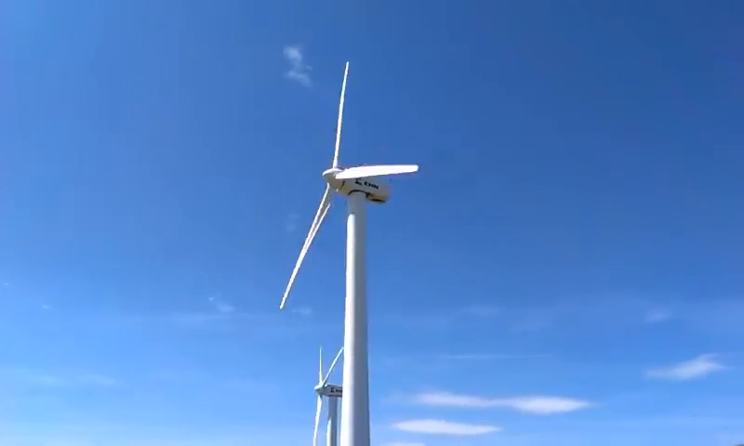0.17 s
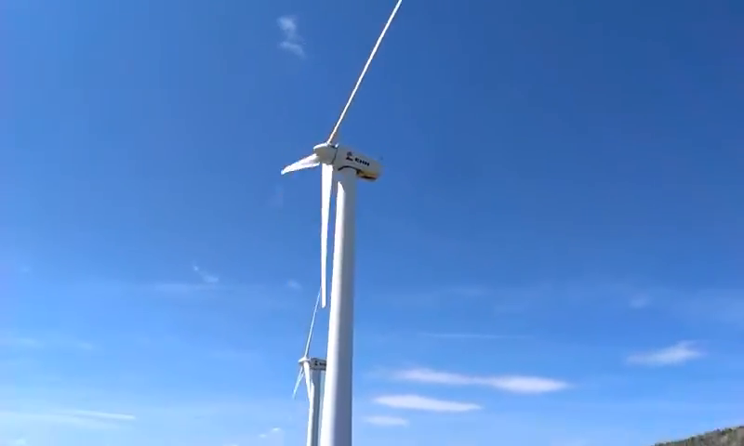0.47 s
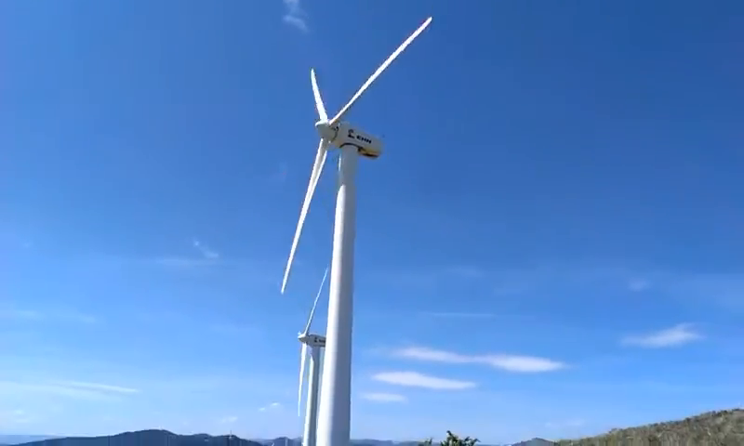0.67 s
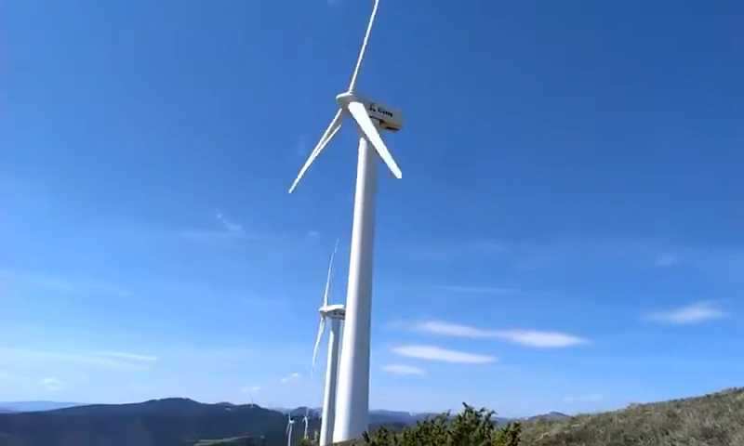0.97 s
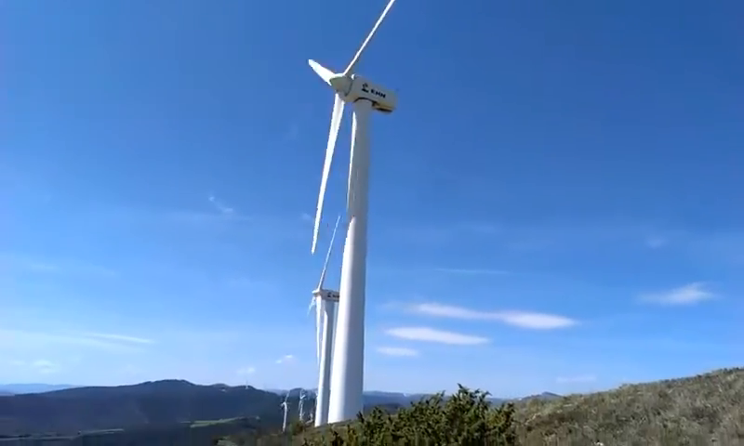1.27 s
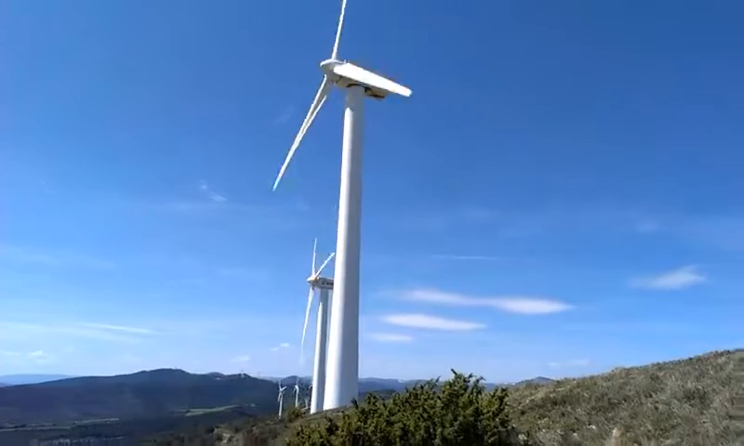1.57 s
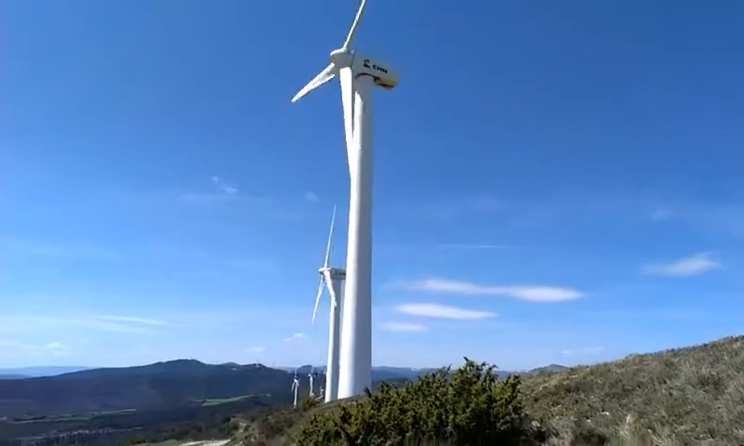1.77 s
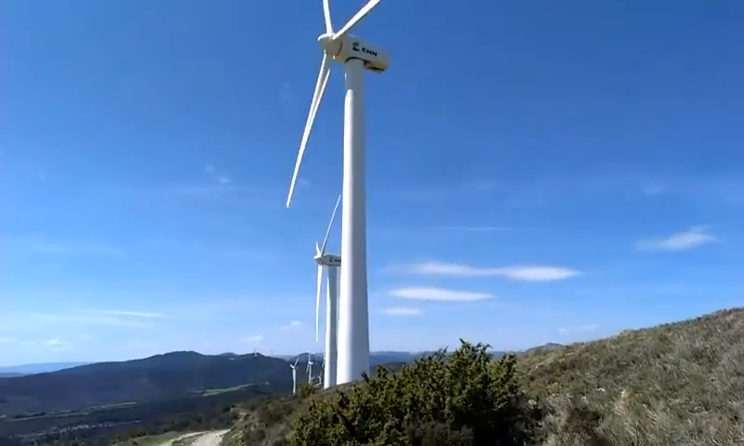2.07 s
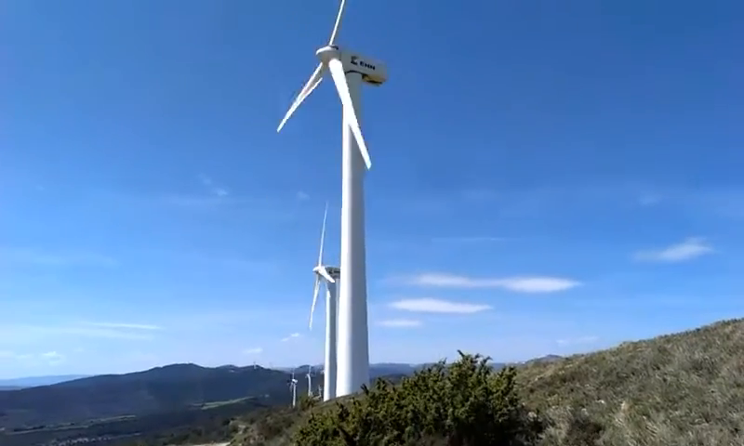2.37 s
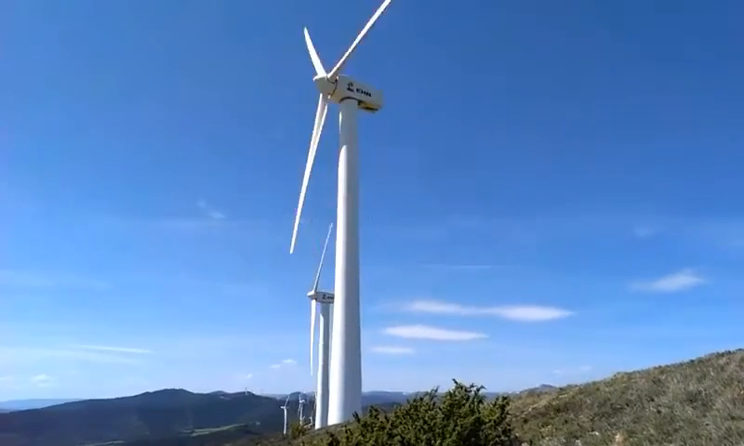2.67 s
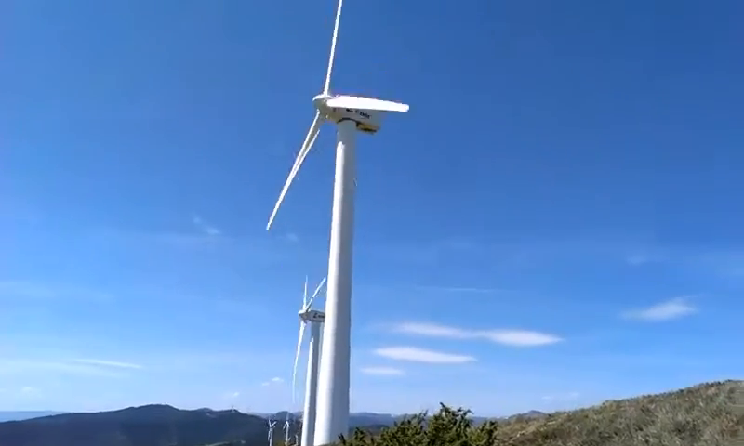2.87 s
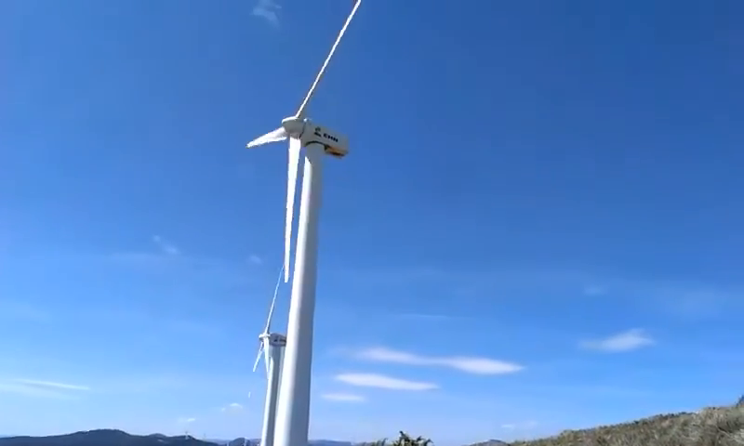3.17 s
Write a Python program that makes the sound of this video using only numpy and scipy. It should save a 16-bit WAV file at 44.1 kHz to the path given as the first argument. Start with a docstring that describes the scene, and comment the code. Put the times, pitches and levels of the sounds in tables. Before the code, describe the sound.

Wind buffets the microphone in uneven thumps and pops over a low rumble.

```python
"""Uneven wind thumps and pops on a bare microphone, over a low rumble, on a hilltop below turbines.
Right at the port, eddies strike and the flow tears off; the hardest ones snap, knock, tick and sputter.
Farther off, the turbines and the open air rush softly, and twice a blade swishes by.
A faint treble hiss is chopped on and off; near the end a bright rustle sets in by the microphone."""
import sys
import numpy as np
from scipy import signal
from scipy.fft import rfft, irfft
from scipy.io import wavfile
from scipy.ndimage import uniform_filter1d, minimum_filter1d

SR = 44100
rng = np.random.default_rng(int(sys.argv[2]) if len(sys.argv) > 2 else 0)


def unload_audio(sound):
    """Save the sound as a 16-bit wav file, at the path given as the first command line argument."""
    columns = np.transpose(np.atleast_2d(sound))
    # keep every value between -1 and 1, then stretch to whole-number steps
    steps = np.round(np.clip(columns, -1, 1) * 32767)
    wavfile.write(sys.argv[1], SR, steps.astype(np.int16))


N = 145971

# How the running sounds rise and fall. Each row: time in seconds, level in dB.
TURBULENCE_LEVELS = [(0, -18.5), (0.06, -18.5), (0.11, -25.5), (0.2, -18.5), (0.31, -29), (0.38, -20.5),
                     (0.46, -22), (0.51, -28), (0.57, -22), (0.65, -28), (0.69, -35.5), (0.75, -23),
                     (0.85, -22.5), (0.98, -29), (1.06, -22.5), (1.17, -23), (1.25, -27), (1.32, -30.5),
                     (1.42, -23.5), (1.52, -37), (1.64, -25), (1.76, -30.5), (1.85, -21.5), (1.96, -40.5),
                     (2.01, -37.5), (2.08, -36.5), (2.16, -28.5), (2.24, -25.5), (2.29, -27), (2.35, -42),
                     (2.4, -39.5), (2.44, -27), (2.49, -41), (2.54, -21.5), (2.64, -28), (2.71, -33.5),
                     (2.79, -27), (2.89, -21.5), (2.99, -27), (3.11, -30), (3.2, -23.5), (3.3, -24.5)]
SWELL_LEVELS = [(0, -25.5), (.12, -21.5), (.26, -20.5), (.31, -40), (.5, -41), (.57, -33.5), (.65, -42),
                (.76, -39.5), (1.2, -32.5), (1.45, -33.5), (1.68, -33.5), (1.95, -30.5), (2.06, -37.5),
                (2.3, -39), (2.45, -42.5), (2.53, -25.5), (2.72, -38), (2.86, -23), (3.0, -28),
                (3.31, -34.5)]  # under 50 Hz
THROB_LEVELS = [(0, -27.5), (.24, -32), (.32, -39), (.55, -30.5), (.65, -45), (.8, -31), (1.0, -28.5),
                (1.15, -30.5), (1.35, -29), (1.52, -36), (1.7, -26.5), (1.95, -27), (2.06, -41.5),
                (2.27, -28.5), (2.4, -34), (2.54, -32), (2.72, -44.5), (2.86, -29), (3.1, -28.5),
                (3.22, -24), (3.31, -35)]  # 50 to 110 Hz
RUSH_LEVELS = [(0, -49), (.13, -65), (.24, -74.5), (.33, -54.5), (.45, -56.5), (.51, -63), (.6, -47.5),
               (.75, -43), (1.02, -44.5), (1.11, -56), (1.35, -47), (1.62, -44), (1.73, -50.5), (1.95, -44),
               (1.995, -54.5), (2.05, -49), (2.47, -49), (2.58, -41.5), (2.86, -46), (3.08, -44),
               (3.19, -45.5), (3.24, -51), (3.31, -63)]
HISS_LEVELS = [(0, -105), (.88, -100), (.93, -77), (1.0, -66.5), (1.04, -100), (1.26, -104), (1.31, -66.5),
               (1.5, -60), (1.57, -79), (1.64, -55), (1.69, -93), (1.76, -58.5), (1.8, -97), (1.97, -101),
               (2.01, -66.5), (2.08, -60.5), (2.13, -73), (2.2, -71), (2.28, -100), (2.33, -68),
               (2.39, -57), (2.435, -85), (2.48, -62), (2.56, -89), (2.59, -68.5), (2.64, -92), (2.71, -67),
               (2.81, -83), (2.9, -88), (3.31, -51)]
RUSTLE_LEVELS = [(2.91, -105), (2.945, -61), (2.964, -46), (3.018, -39), (3.126, -44.5), (3.208, -32),
                 (3.25, -41.5), (3.31, -33)]
# Pressure pops. Each row: time in seconds, relative peak in dB, ring frequency in Hz.
POPS = [(.0039, -18, 636), (.0228, -11, 800), (.028, -19, 650), (.041, -11, 950), (0.0459, -21.5, 660),
        (.0569, -13.5, 796), (.0611, -16.5, 780), (0.0687, -22, 655), (0.0748, -9, 990),
        (0.077, -15.5, 775), (0.0818, -10.5, 900), (0.151, -13.5, 620), (0.1834, -10.5, 760),
        (.1915, -14, 760), (.1962, -15, 800), (.204, -12.5, 760), (0.2356, -15, 520), (.2577, -16.5, 690),
        (.2783, -11.5, 620), (0.2892, -16, 837), (0.3303, -20.5, 570), (0.3392, -15, 610),
        (.4064, -19.5, 630), (.4151, -13, 560), (0.4293, -11, 560), (.4545, -16, 690), (.4927, -17.5, 605),
        (.5381, -17, 580), (0.552, -19, 480), (0.7246, -23.5, 660), (0.742, -31, 700), (0.7753, -18.5, 680),
        (.7796, -13, 980), (0.8039, -15.5, 700), (0.8177, -15, 604), (0.8574, -11.5, 554),
        (.8693, -24.5, 1065), (.9176, -20.5, 595), (0.9385, -27, 660), (1.055, -23, 680),
        (1.0902, -17, 610), (1.1174, -23, 540), (1.1216, -16.5, 600), (1.1387, -17.5, 640),
        (1.1476, -25, 480), (1.1535, -23.5, 560), (1.2133, -10, 880), (1.2772, -7.5, 890),
        (1.2808, -6.5, 580), (1.283, -14.5, 515), (1.2854, -12.5, 720), (1.4216, -24, 606),
        (1.4832, -21, 640), (1.5614, -31, 597), (1.821, -17.5, 850), (1.9439, -18.5, 563),
        (1.9759, -21, 580), (2.23, -20, 397), (2.2524, -15.5, 505), (2.5202, -13, 600), (2.5741, -15, 632),
        (2.8239, -18.5, 610), (2.8516, -14, 640), (2.8706, -17.5, 594), (2.9029, -14.5, 700),
        (2.9164, -21, 603), (2.9294, -20.5, 620), (2.9327, -21.5, 650), (2.9577, -24.5, 684),
        (3.0252, -15, 560), (3.0432, -20.5, 624), (3.1588, -13.5, 656), (3.1972, -18.5, 550),
        (3.2252, -16, 450), (3.2396, -11, 500), (3.245, -17.5, 500), (3.2605, -18.5, 600),
        (3.2684, -20.5, 560), (3.3, -18, 490)]
# Eddies on the port. Each row: centre in seconds, relative level in dB, half length in seconds,
# treble corner in Hz.
BUFFETS = [(0.025, -14, 0.003, 480), (0.07, -22, 0.0062, 420), (0.082, -19, 0.0052, 650),
           (0.149, -29, 0.021, 400), (0.187, -17.5, 0.012, 450), (0.282, -24, 0.013, 510),
           (0.337, -20, 0.0067, 322), (0.412, -25, 0.018, 380), (0.491, -16, 0.0064, 276),
           (0.551, -12, 0.004, 306), (0.598, -28, 0.012, 270), (0.723, -22, 0.0097, 317),
           (0.775, -21, 0.0032, 340), (0.81, -23, 0.0069, 400), (0.859, -18, 0.0071, 640),
           (0.92, -23, 0.0054, 320), (1.096, -24.5, 0.006, 330), (1.14, -33.5, 0.021, 250),
           (1.163, -19, 0.0065, 230), (1.212, -17.5, 0.0068, 540), (1.234, -18, 0.0048, 336),
           (1.282, -12.5, 0.0073, 440), (1.452, -23.5, 0.0097, 306), (1.489, -22, 0.0066, 318),
           (1.562, -22, 0.0069, 416), (1.682, -17.5, 0.0072, 220), (1.824, -27.5, 0.005, 400),
           (1.886, -16, 0.0054, 183), (1.944, -25.5, 0.011, 433), (1.97, -20, 0.0077, 322),
           (1.999, -33.5, 0.0091, 190), (2.045, -25, 0.0035, 245), (2.125, -31, 0.011, 420),
           (2.166, -29, 0.0064, 390), (2.227, -23.5, 0.016, 229), (2.259, -17.5, 0.007, 260),
           (2.314, -19.5, 0.0041, 299), (2.52, -21, 0.0071, 348), (2.575, -15.5, 0.0038, 312),
           (2.62, -20, 0.012, 181), (2.695, -24, 0.0093, 191), (2.749, -16, 0.0046, 208),
           (2.783, -22.5, 0.0064, 232), (2.827, -18, 0.0067, 306), (2.855, -16.5, 0.0052, 282),
           (2.903, -29, 0.015, 450), (3.03, -16, 0.0096, 370), (3.151, -24.5, 0.014, 344),
           (3.203, -18.5, 0.012, 280), (3.225, -17.5, 0.0063, 282), (3.243, -14.5, 0.0043, 357)]
# Short hits on the microphone. Each row: time in seconds, level in dB.
SNAPS = [(.0228, -36), (.041, -30), (.0437, -28.5), (.054, -30.5), (.0736, -32.5), (.078, -33),
         (.0818, -23.5), (.1825, -30), (.1912, -45), (.2047, -32), (.2885, -31.5), (.7798, -32),
         (.8693, -49), (1.2138, -21), (1.2767, -27)]
KNOCKS = [(.044, -24), (.074, -23), (.079, -20), (.191, -29), (1.2, -20.5), (1.2105, -10.5), (1.277, -28),
          (1.819, -17)]
TICKS = [(.265, -34.5), (0.2793, -26), (0.779, -21), (1.214, -23), (1.277, -35)]
# Sputters at the port. Each row: centre in seconds, level in dB, half length in seconds.
CRACKLES = [(0.277, -72, 0.0033), (0.778, -57, 0.0052), (.922, -62, 0.0067), (1.082, -68, 0.0074),
            (1.206, -57, 0.0071), (1.274, -59, 0.0067), (1.829, -57.5, 0.0089), (2.249, -56, 0.0073),
            (2.318, -64.5, .007), (2.526, -59.5, 0.013), (2.849, -59.5, .006)]
# Passing blades. Each row: centre in seconds, level in dB.
SWISHES = [(0.948, -53), (2.841, -44.5)]
# Each sound's spectrum at the microphone. Each row: frequency in Hz, relative gain in dB.
TURBULENCE_COLOUR = [(20, -21.5), (50, -2.5), (100, -3.5), (200, 2), (320, -4), (500, -10.5), (800, -22.5),
                     (1300, -33), (2500, -50), (4000, -104.5), (9000, -120)]
SWELL_COLOUR = [(6, -11), (20, -2.5), (42, 0.5), (55, -11.5), (100, -42.5), (400, -120)]
THROB_COLOUR = [(10, -42), (30, -28.5), (52, 2.5), (70, 3), (100, 3), (130, -5), (200, -32), (1000, -120)]
RUSH_COLOUR = [(60, 10.5), (400, 6.5), (800, 4), (1400, 2), (2200, -0.5), (2800, -9.5), (3400, -18),
               (4200, -60), (9000, -79)]
TICK_COLOUR = [(600, -4.5), (1500, 10), (2500, -2.5), (4000, -15.5), (7000, -21.5), (9500, -37.5),
               (13000, -64.5)]
CRACKLE_COLOUR = [(1200, -12.5), (2500, 5.5), (4500, 3.5), (7200, 4.5), (8500, -19.5), (13000, -23.5)]
SWISH_COLOUR = [(500, -21.5), (1150, 4), (1500, -6.5), (1950, -2), (2300, 4.5), (2600, -1.5), (3200, -16),
                (4200, -37.5), (8000, -85)]
HISS_COLOUR = [(800, -22.5), (2500, 7.5), (3600, 5.5), (4600, -7), (6500, 10), (7500, -3.5), (8600, -18.5),
               (10000, -31), (16000, -53)]
RUSTLE_COLOUR = [(1500, -20.5), (3000, -12), (4100, -1), (5600, -1), (7200, 4.5), (8800, -3), (10500, -11),
                 (12000, -27.5), (15000, -49)]

TIME = np.arange(N) / SR


def undb(db):
    return 10 ** (np.asarray(db) / 20)


def curve(levels):
    """Gain over time from (s, dB) points."""
    s, db = np.array(levels).T
    return undb(np.interp(TIME, s, db))


def response(colour):
    """Gain per frequency from (Hz, dB) points."""
    hz, db = np.array(colour).T
    return undb(np.interp(np.log(np.fft.rfftfreq(N, 1 / SR) + 1), np.log(hz), db))


def coloured(x, colour):
    """The signal filtered to a colour, rms 1."""
    x = irfft(rfft(x) * response(colour), N)
    return x / x.std()


def noise(colour):
    """Coloured noise, rms 1."""
    return coloured(rng.standard_normal(N), colour)


def grains(colour, per_s, spread_db):
    """A coloured stream of tiny clicks of uneven size, rms 1."""
    clicks = (rng.random(N) < per_s / SR) * np.sign(rng.standard_normal(N))
    return coloured(clicks * undb(spread_db * rng.standard_normal(N)), colour)


def steady(x, span_s):
    """Hold the rms near 1 over the given span."""
    size = int(span_s * SR)
    power = uniform_filter1d(uniform_filter1d(x * x, size), size)
    return x / np.sqrt(power + 1e-12)


def wander(rate_hz):
    """Smooth random wander, spread 1."""
    hz = np.fft.rfftfreq(N, 1 / SR)
    x = irfft(rfft(rng.standard_normal(N)) / (1 + (hz / rate_hz) ** 4), N)
    return x / x.std()


def hump(t, half_s):
    """A bell-shaped envelope around t = 0."""
    return np.exp(-(t / half_s) ** 2)


def turbulence(brighten=0.49, gain_db=-1):
    """Flow flutters over the microphone port; each stronger flutter is also brighter."""
    flow = noise(TURBULENCE_COLOUR)
    flutter_db = 3 * wander(rate_hz=89)
    lows = signal.sosfiltfilt(signal.butter(2, 400, fs=SR, output="sos"), flow)
    highs = (flow - lows) * undb(brighten * flutter_db)
    fluttering = steady((lows + highs) * undb(flutter_db), span_s=0.055)
    return fluttering * curve(TURBULENCE_LEVELS) * undb(gain_db)


def rumble():
    """Large, slow eddies rock the diaphragm: a deep swell and a quicker throb."""
    swell = steady(noise(SWELL_COLOUR), span_s=0.044) * curve(SWELL_LEVELS)
    throb = steady(noise(THROB_COLOUR), span_s=0.14) * curve(THROB_LEVELS)
    return swell + throb


def rush(flicker_db=2):
    """Soft air noise from the turbines and the hillside, well away from the microphone."""
    return noise(RUSH_COLOUR) * curve(RUSH_LEVELS) * undb(flicker_db * wander(rate_hz=22))


def pops(q=0.89, low_hz=168, top_hz=3280, gain_db=2):
    """The flow tears off the port: a spike of suction that rings for a cycle or two."""
    size = 2048
    jf = 1j * np.fft.rfftfreq(size, 1 / SR)
    low_cut = jf / (jf + low_hz)
    top_cut = signal.butter(6, top_hz, fs=SR, output="sos")
    out = np.zeros(N + size)
    for s, db, ring_hz in POPS:
        resonance = 1 / (1 + jf / (q * ring_hz) + (jf / ring_hz) ** 2)
        pop = signal.sosfilt(top_cut, irfft(low_cut * resonance ** 2))
        start = int(s * SR) - np.argmax(np.abs(pop))
        out[start:start + size] -= pop / np.abs(pop).max() * undb(db + gain_db)
    return out[:N]


def snaps(hz=1790, half_s=0.00052):
    """In the strongest eddies the pressure flips abruptly: a hard snap of about two cycles."""
    out = np.zeros(N)
    for s, db in SNAPS:
        age = TIME - s
        out -= undb(db) * hump(age, half_s) * np.cos(2 * np.pi * hz * age)
    return out


def buffets(low_hz=166, rolloff_order=4.32, skew=0.17, gain_db=2):
    """Eddies thump the port with a few pressure swings; each has its own length and brightness."""
    size = 8192
    t = (np.arange(size) - size // 2) / SR
    hz = np.fft.rfftfreq(size, 1 / SR)
    low_cut = hz ** 2 / (hz ** 2 + low_hz ** 2)
    out = np.zeros(N + 2 * size)
    for s, db, half_s, corner_hz in BUFFETS:
        envelope = hump(t, half_s * (1 + skew * np.sign(t)))  # rises faster than it falls
        colour = low_cut / (1 + (hz / corner_hz) ** 2) ** (rolloff_order / 2)
        swings = irfft(rfft(rng.standard_normal(size)) * colour)
        burst = envelope * steady(swings, span_s=0.015)
        burst *= np.sqrt(np.sum(envelope ** 2) / np.sum(burst ** 2))
        start = int(s * SR) + size // 2
        out[start:start + size] += burst * undb(db + gain_db)
    return out[size:size + N]


def knocks(cavity_hz=880, rise_s=0.0013, decay_s=0.0017):
    """An eddy blows across the port and its cavity rings hollow for a few cycles."""
    out = np.zeros(N)
    for s, db in KNOCKS:
        age = np.maximum(TIME - s, 0)
        envelope = (1 - np.exp(-age / rise_s)) * np.exp(-age / decay_s)
        out += undb(db) * envelope * np.sin(2 * np.pi * cavity_hz * age)
    return out


def ticks():
    """Single thin clicks at the port as the hardest eddies hit."""
    spikes, colour = np.zeros(N), response(TICK_COLOUR)
    for s, db in TICKS:
        spikes[int(s * SR)] -= undb(db)
    click_peak = irfft(colour, N)[0]
    return irfft(rfft(spikes) * colour, N) / click_peak


def crackles():
    """The port sputters: a ragged cluster of tiny clicks around a buffet."""
    bursts = sum(undb(db) * hump(TIME - s, half_s) for s, db, half_s in CRACKLES)
    return grains(CRACKLE_COLOUR, per_s=3200, spread_db=3.5) * bursts


def swishes(half_s=0.16):
    """A turbine blade sweeps by above the hilltop: midrange air noise swells and fades."""
    passes = sum(undb(db) * hump(TIME - s, half_s) for s, db in SWISHES)
    return noise(SWISH_COLOUR) * passes


def hiss():
    """A faint, scratchy treble hiss, chopped on and off as by audio compression."""
    return grains(HISS_COLOUR, per_s=6600, spread_db=4.5) * curve(HISS_LEVELS)


def rustle(grain_db=0.5):
    """A finely grained hiss close to the microphone, as of fabric sliding."""
    return noise(RUSTLE_COLOUR) * curve(RUSTLE_LEVELS) * undb(grain_db * wander(rate_hz=200))


def scene():
    """One microphone on the hilltop: wind right on the port, the turbines behind."""
    wind = turbulence() + rumble() + pops() + snaps() + buffets() + knocks() + ticks() + crackles()
    return (wind + rush() + swishes() + hiss() + rustle())[None]


def record(dry, ceiling=0.38, limiter_s=0.0077, top_hz=13500):
    """After the microphone, a fast limiter holds down the strongest peaks and the top is cut."""
    size = int(limiter_s * SR)
    gain = 1 / (1 + (dry[0] / ceiling) ** 4) ** (1 / 4)
    held = minimum_filter1d(gain, 2 * size)
    smoothed = uniform_filter1d(uniform_filter1d(held, size), size)
    top_cut = signal.ellip(8, .2, 70, top_hz, fs=SR, output="sos")
    return signal.sosfilt(top_cut, dry * smoothed)


dry = scene()
out = record(dry)
unload_audio(out)
```